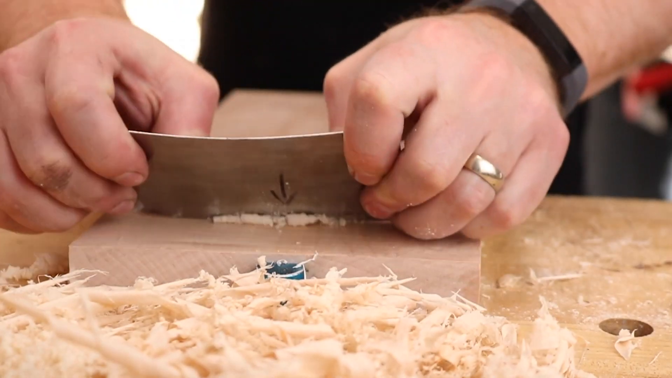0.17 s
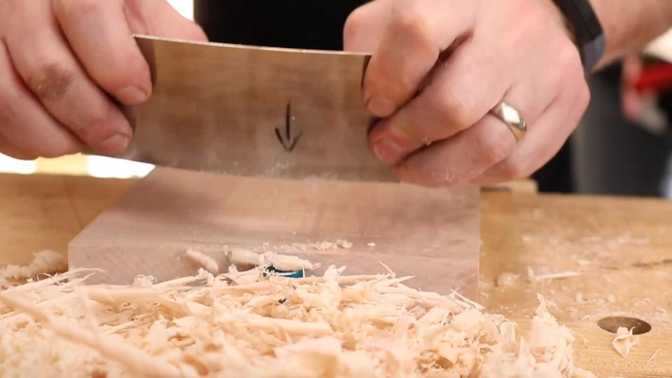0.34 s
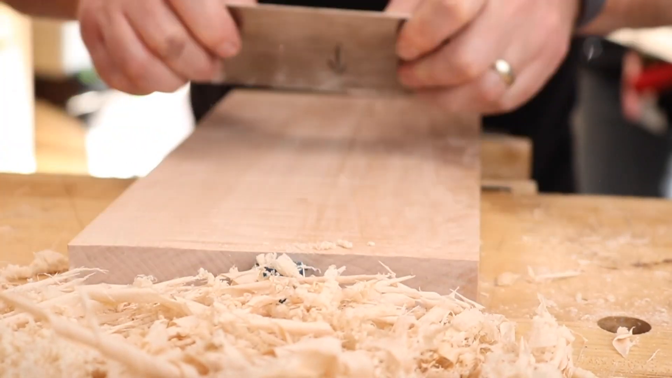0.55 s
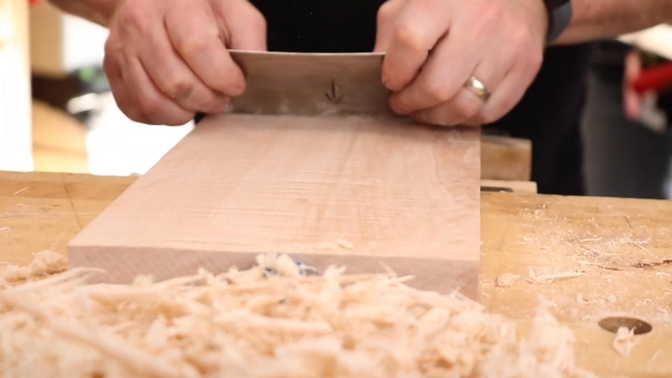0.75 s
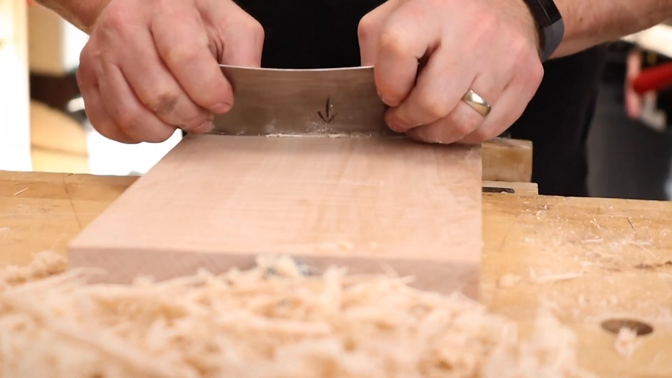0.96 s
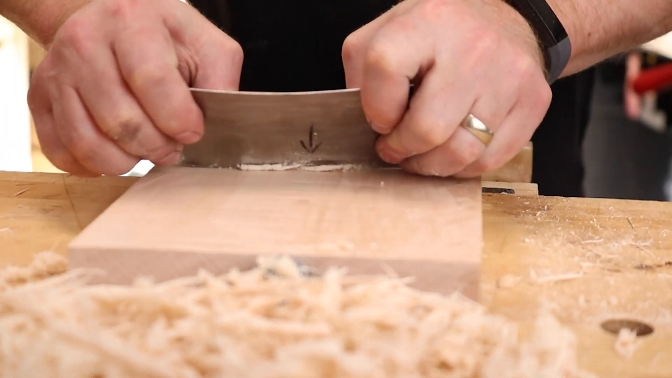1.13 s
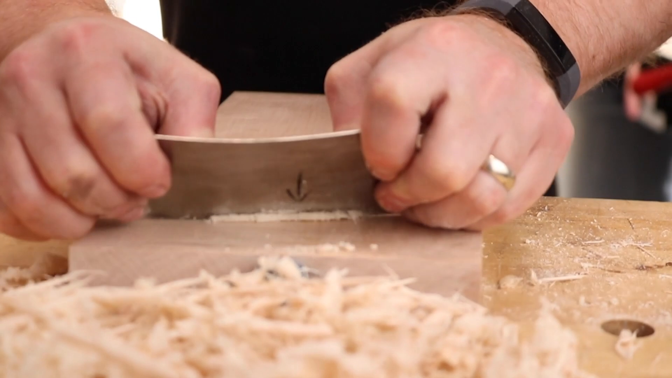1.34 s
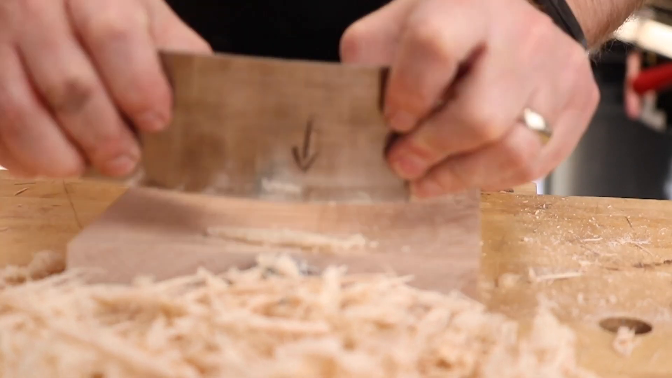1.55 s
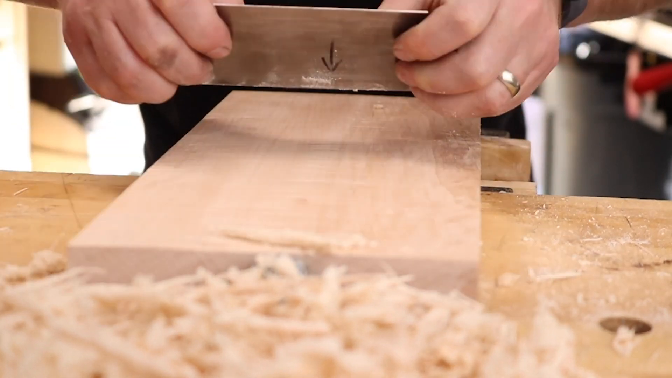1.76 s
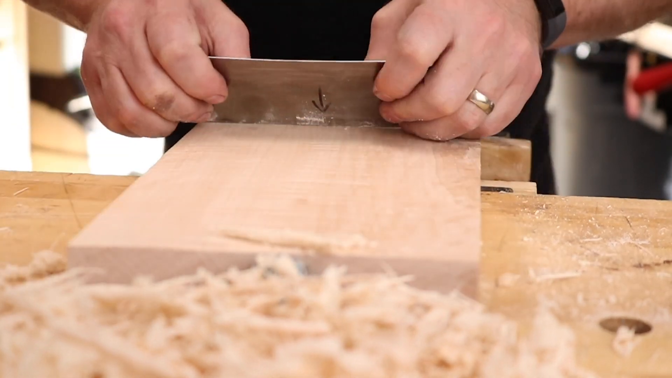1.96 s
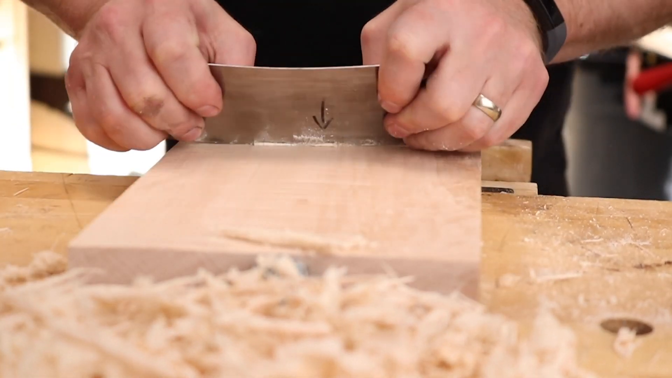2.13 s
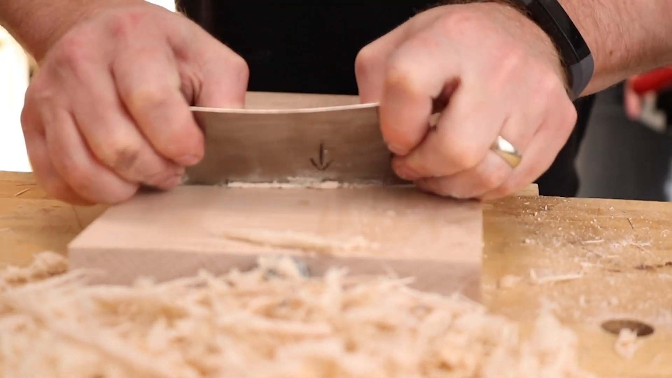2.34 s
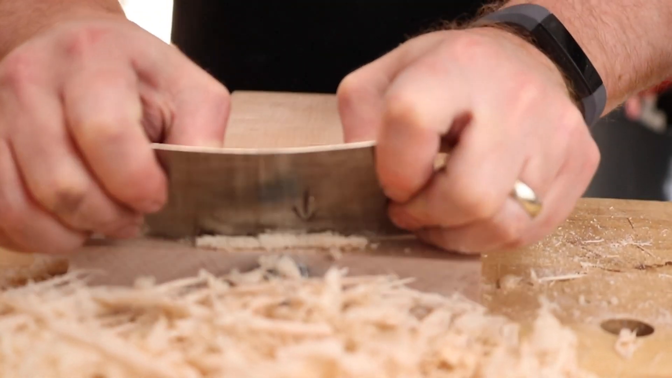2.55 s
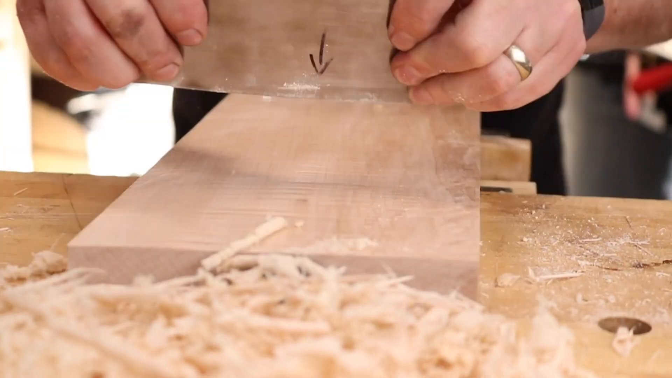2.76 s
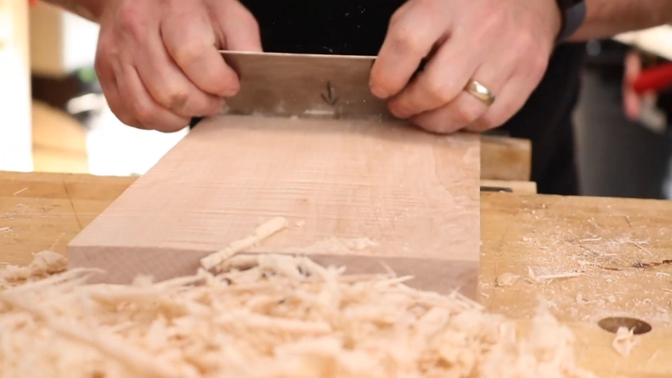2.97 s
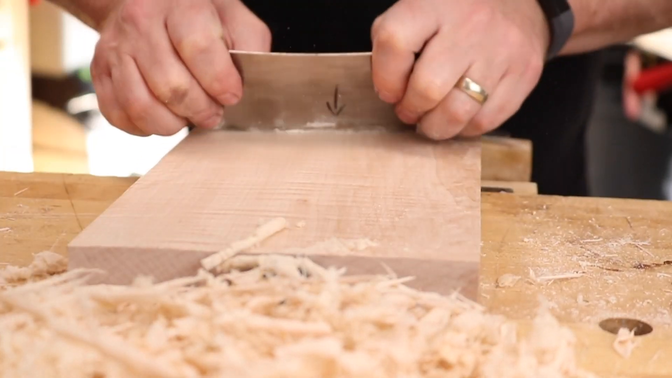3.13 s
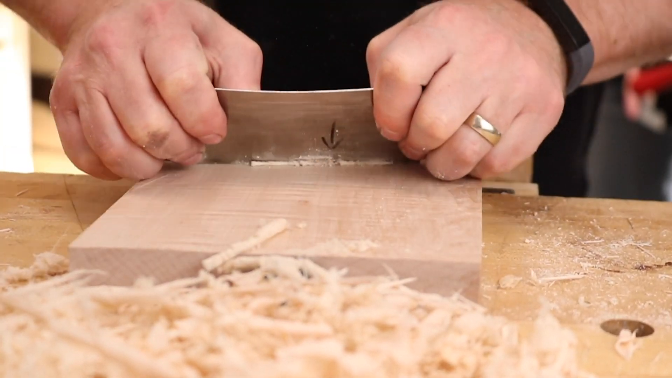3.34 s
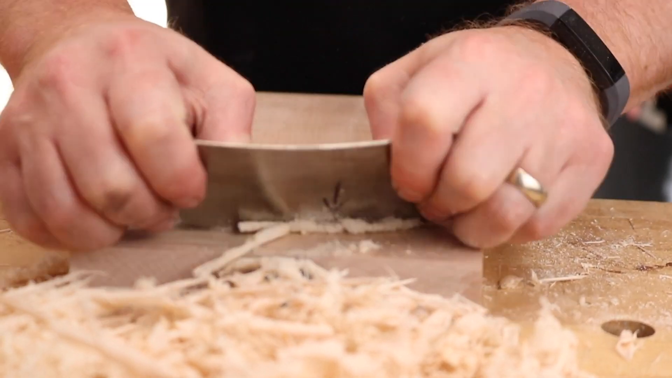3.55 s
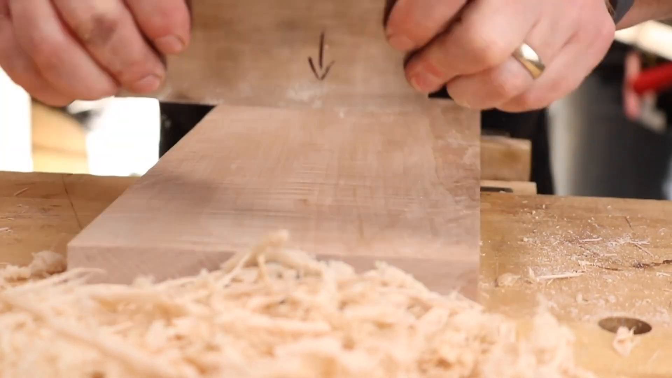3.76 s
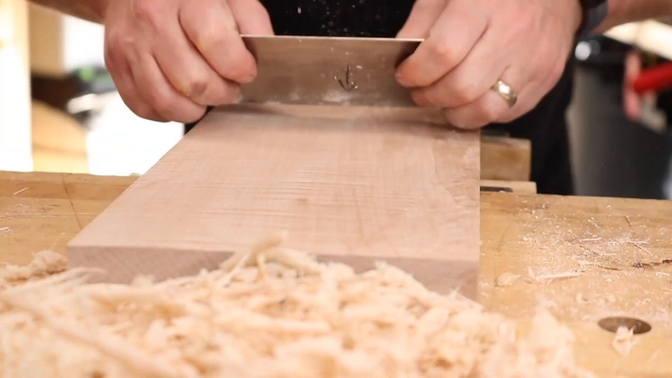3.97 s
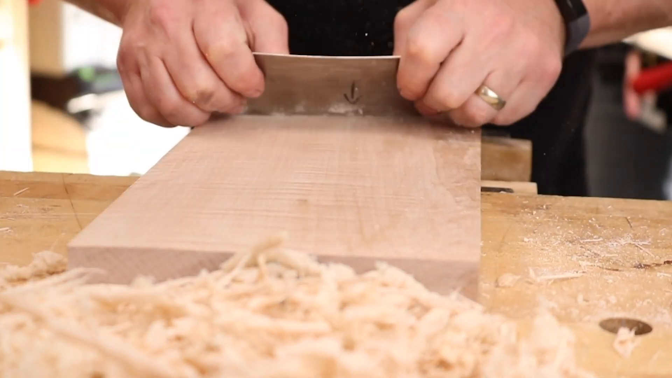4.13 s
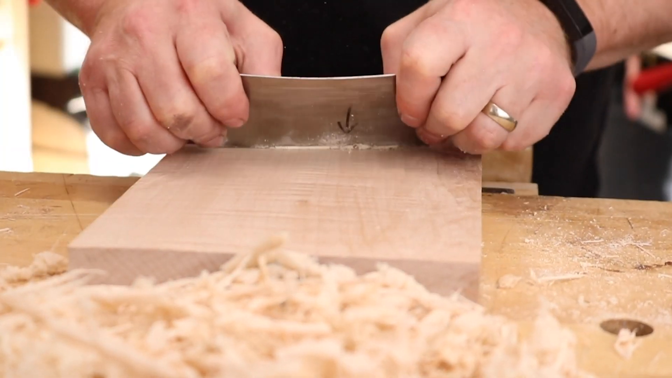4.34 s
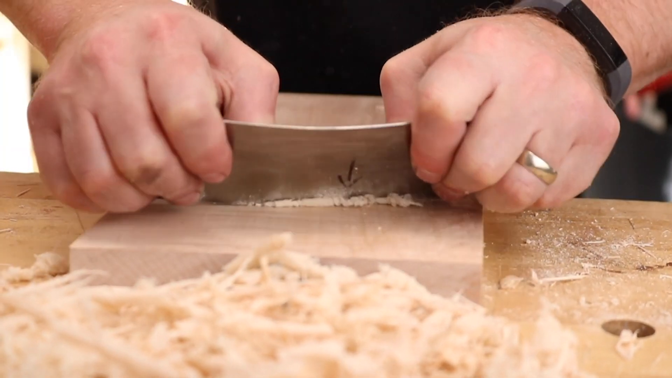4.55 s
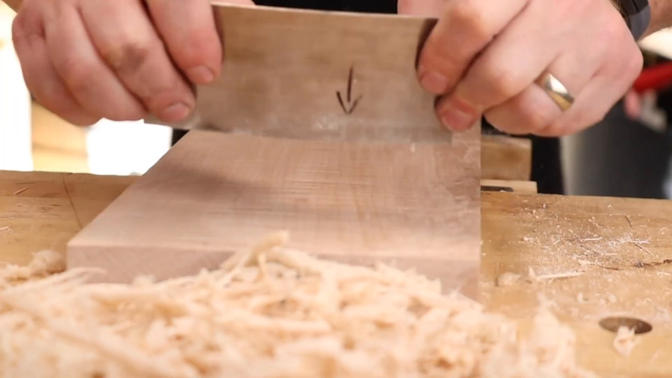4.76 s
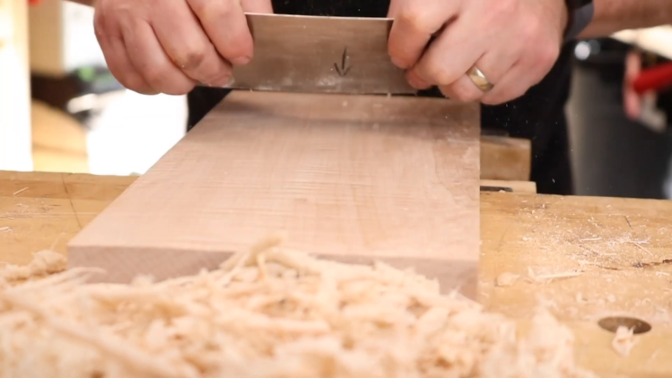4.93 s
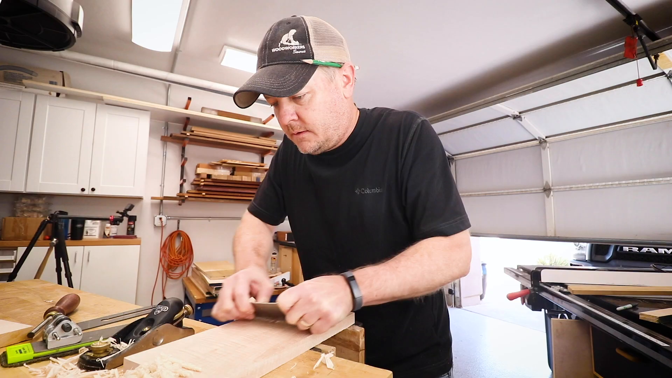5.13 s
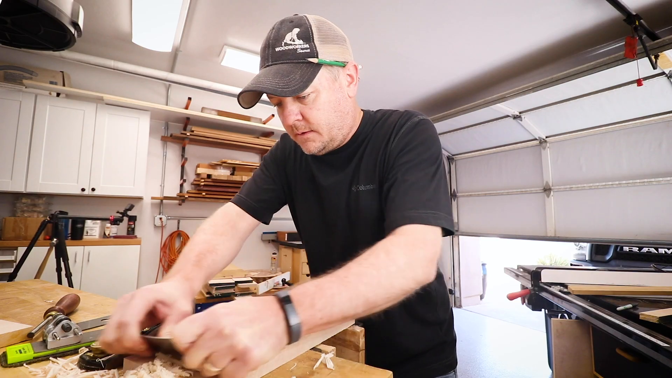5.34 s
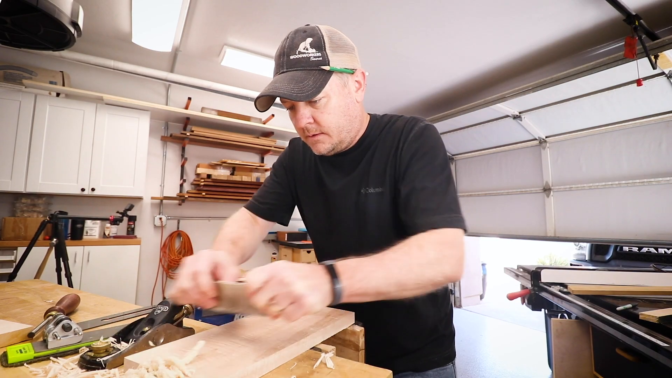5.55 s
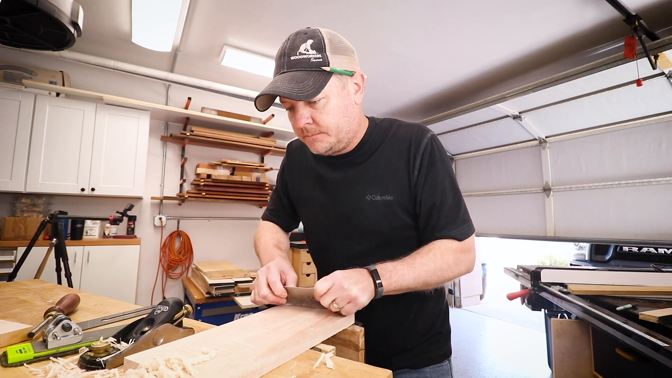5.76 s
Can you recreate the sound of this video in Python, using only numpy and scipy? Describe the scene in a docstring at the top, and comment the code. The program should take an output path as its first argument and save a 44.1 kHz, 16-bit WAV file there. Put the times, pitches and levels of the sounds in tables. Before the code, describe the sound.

A steel hand scraper is pushed along a hardwood board six times, about once a second. Each stroke opens with a knock as the blade is set down, then a bright, scratchy hiss swells and fades, with a thin squeal and occasional chatter. Some strokes run off the end with a bump, and the bench rumbles faintly. The microphone is close, in a small, quiet workshop.

```python
"""A steel card scraper, pushed six times along a hardwood board on the bench of a small, quiet shop.
Each stroke opens with a knock as the blade is set down, then hisses as the burr tears a shaving, and
now and then chatters. Some strokes run off the end and bump the bench, which rocks with a low rumble.
One close microphone, with a short room tail and a faint hum behind the work.
The hardest knocks clip at full scale, with a brief crunch."""
import sys
import numpy as np
from scipy import signal
from scipy.fft import rfft, irfft, next_fast_len
from scipy.io import wavfile
from scipy.ndimage import uniform_filter1d

SR = 44100
rng = np.random.default_rng(int(sys.argv[2]) if len(sys.argv) > 2 else 0)


def store_pcm(level_fs):
    """Save levels as 16-bit WAV."""
    pcm = np.round(np.clip(level_fs, -1, 1) * 32767).astype(np.int16)
    wavfile.write(sys.argv[1], SR, np.atleast_2d(pcm).T)


N = 255492
TIME = np.arange(N) / SR
STEPS = np.arange(0, N / SR, 1 / 1000)  # the hand's controls move once a millisecond

# the pushes: (start [s], end [s], cut [dB], fastest point [share of the stroke],
# slowing by the end [dB], drag [dB], rocking of the bench [dB])
STROKES = [(0.252, 0.741, -26, 0.52, 25.5, -33.5, -44.5), (1.137, 1.679, -27, 0.61, 9, -35.5, -42),
           (2.158, 2.751, -28, 0.71, 30, -35.5, -43), (3.135, 3.699, -30, 0.8, 22.5, -36.5, -36),
           (4.065, 4.594, -27.5, 0.68, 21.5, -35, -40.5), (5.038, 5.533, -27, 0.48, 25, -35.4, -47)]
# spectrum of the squealing blade: (frequency [Hz], density [dB])
SQUEAL = [(2500, -43), (3700, -9.5), (4150, -4.5), (4900, -2), (5750, -1.5), (6600, -3.5), (7500, -6),
          (11000, -22.5)]


def gain_of(db):
    """Decibels to amplitude."""
    return 10 ** (np.asarray(db) / 20)


def evened(x):
    """Scales to rms 1."""
    return x / np.sqrt(np.mean(x ** 2) + 1e-20)


def read(points, hz):
    """Reads a table on a log-frequency axis."""
    f, value = np.transpose(points)
    return np.interp(np.log(hz + 1), np.log(f + 1), value)


def add(mix, s, sound):
    """Mixes a sound in at time s."""
    part = mix[max(round(s * SR), 0):][:len(sound)]
    part += sound[:len(part)]


def bump(time, s, half_width):
    """A smooth swell of height 1 around time s."""
    return np.exp(-np.minimum(((time - s) / half_width) ** 2, 20))


def coloured(x, spectrum, resonances=()):
    """Gives x a spectrum with resonant peaks, at rms 1."""
    size = next_fast_len(N, real=True)
    hz = np.fft.rfftfreq(size, 1 / SR)
    peaks_db = sum(lift / (1 + (2 * (hz - f) / width) ** 2) for f, width, lift in resonances)
    return evened(irfft(rfft(x, size) * gain_of(read(spectrum, hz) + peaks_db), size)[:N])


def wander(hz):
    """Random drift up to a rate, at rms 1."""
    size = next_fast_len(N, real=True)
    rolloff = 1 + (np.fft.rfftfreq(size, 1 / SR) / hz) ** 4
    return evened(irfft(rfft(rng.standard_normal(size)) / rolloff, size)[:N])


def room_tone(air_db=-71, hum_hz=317.6, hum_db=-73):
    """Still shop air and a faint machine hum."""
    # spectrum of the air: (frequency [Hz], density [dB])
    air = [(20, 0), (80, -2), (160, -3), (260, -8), (400, -16), (700, -24), (1500, -27), (4000, -34),
           (9000, -44), (16000, -58)]
    hum = evened(np.sin(2 * np.pi * hum_hz * TIME + .3 * wander(hz=4)))
    return gain_of(air_db) * coloured(rng.standard_normal(N), air) + gain_of(hum_db) * hum


def ring(modes, place_hz, lift_db=8, octaves=0.25):
    """Dying modes; the place of the blow lifts those near one frequency."""
    t = TIME[:SR // 2]
    hz, db, t60 = np.transpose(modes)[:, :, None]
    db = db + lift_db * np.exp(-(np.log2(hz / place_hz) / octaves) ** 2)
    signs = np.cos(np.pi * np.arange(len(modes)))  # neighbours swing in opposite directions
    return signs @ (gain_of(db - 60 * t / t60) * np.sin(2 * np.pi * hz * t))


def click(t60=.009, band_hz=(2700, 9000)):
    """Steel meets wood: a bright crunch of a few milliseconds."""
    t = TIME[:SR // 2]
    crunch = signal.lfilter(*signal.butter(2, band_hz, "band", fs=SR), rng.standard_normal(len(t)))
    return evened(crunch) * gain_of(-60 * t / t60)


def room_tail(x):
    """The shop's walls answer: sparse reflections, each band dying at its own speed."""
    # decay of the room: (frequency [Hz], t60 [s])
    decay = [(100, .35), (300, .38), (900, .41), (1500, .39), (2500, .31), (5500, .25), (10000, .2),
             (16000, .145)]
    taps = rng.choice([-1., 1.], SR // 2) * (rng.random(SR // 2) < .15)
    hz, t, bands = signal.stft(taps, SR, nperseg=256)
    tail = signal.istft(bands * gain_of(-60 * t / read(decay, hz)[:, None]), SR, nperseg=256)[1]
    tail *= np.clip(TIME[:len(tail)] / 0.008 - 1, 0, 1)  # 8 ms before the walls are heard
    return signal.fftconvolve(x, tail / np.linalg.norm(tail))[:len(x)]


def knock(contact_hz, place_hz, bench_db, blade_db, thud_db, room_db):
    """A blow rings board, bench and blade; a soft contact weakens the click and the board's high modes."""
    # modes of board, bench, blade and the low thud: (frequency [Hz], level [dB], t60 [s])
    board = [(467.5, -30, .13), (525, -28.5, .08), (660, -16, .075), (775, -12.5, 0.066),
             (871, -15.5, .075), (1065, 0.5, 0.0086), (1295, 2.5, 0.005), (1640, -7.5, 0.018),
             (2050, -6, 0.0084), (2620, -8.5, 0.022), (3303, -15, 0.0069), (4880, -9, 0.0036)]
    bench = [(177, -33, .18), (247, -16, 0.022), (305, -26.5, 0.083), (337, -36.5, 0.24),
             (448.4, -16, 0.053), (534, -20, .04), (687, -16.5, 0.083), (824, -17.5, 0.055),
             (885.5, -10.5, 0.067), (930, -7.5, 0.02), (1058, -18, 0.11), (1190, -19, 0.0046),
             (1500, -25.5, 0.02), (1746, -40.5, 0.032)]
    blade = [(1438, -10, 0.027), (2020, -14.5, 0.013), (2894, -4.5, 0.015), (3310, -7.5, 0.011),
             (3990, -9, 0.018), (4480, -11.5, 0.024), (5800, -10.5, 0.011), (7250, -18.5, 0.0019)]
    thud = [(53.5, -6.5, 0.033), (82, -8.5, 0.058), (161, -13.5, 0.024)]
    # near echoes off the bench top and the worker's body: (delay [s], amplitude [share])
    echoes = [(.0054, 0.31), (0.0205, 0.039)]
    blow = signal.lfilter(*signal.butter(2, contact_hz, fs=SR), ring(board, place_hz))
    for modes, db in [(bench, bench_db), (blade, blade_db), (thud, thud_db)]:
        blow += gain_of(db) * ring(modes, place_hz)
    click_db = -19 + 12 * np.log2(contact_hz / 3120)  # 12 dB more per octave of hardness
    blow += gain_of(click_db) * click()
    out = blow + gain_of(room_db) * room_tail(blow)
    dulled = signal.lfilter(*signal.butter(1, 3000, fs=SR), blow)  # the echoes lose their treble
    for delay, share in echoes:
        add(out, delay, share * dulled)
    return out


def knocks():
    """The blade is set down, ticks on fibres and runs off the end of the board."""
    # the blade lands: (time [s], strength [dB], contact hardness [Hz], favoured frequency [Hz],
    # bench against board [dB], blade against board [dB])
    set_downs = [(0.1383, 2, 3110, 1198, -15.5, -15), (1.0772, -5, 3480, 2210, -10, -15.5),
                 (2.0522, -9, 900, 720, -24, -33), (3.0535, -11.5, 2950, 795, -27, -7.5),
                 (4.0221, 3, 3860, 2330, -13, -23), (4.9014, -11.5, 2870, 503, -10, -14.5)]
    # bumps as it runs off: (the same six columns, thud against board [dB], room against blow [dB])
    overruns = [(0.7394, -21, 1500, 434, -15, -7, -44, -16), (1.671, -15, 3386, 2170, 0.5, 8, 1, -7),
                (2.644, 2.5, 1140, 1151, -3.5, -47.5, -23, -7),
                (2.653, -19.5, 1103, 239, 14, -27.5, -19, -5),
                (2.705, -21.5, 1110, 1000, -12.5, -35, -36, 9.5)]
    # the edge catches on a fibre: (time [s], strength [dB], contact hardness [Hz])
    catches = [(0.2731, -15.5, 5200), (2.2765, -21, 3000)]
    out = np.zeros(N)
    for s, db, contact_hz, place_hz, bench_db, blade_db in set_downs:
        landing = knock(contact_hz, place_hz, bench_db, blade_db, thud_db=bench_db - 22.5, room_db=-11.5)
        add(out, s, gain_of(db) * landing)
    for s, db, *contact in overruns:
        add(out, s, gain_of(db) * knock(*contact))
    for s, db, contact_hz in catches:
        tick = knock(contact_hz, place_hz=2000, bench_db=-29.5, blade_db=-5, thud_db=-42, room_db=-12)
        add(out, s, gain_of(db) * tick)
    return out


def push(start, end, fastest, slowing_db, gather_db=16.5, hold_s=0.0083, lift_s=.006):
    """A stroke gathers speed, then slows ever faster: edge contact (0-1) and speed (dB re its top)."""
    progress = np.clip((STEPS - start) / (end - start), 0, 1)
    gathering = np.maximum(1 - progress / fastest, 0)
    slowing = np.maximum((progress - fastest) / (1 - fastest), 0)
    taking_hold = np.clip((STEPS - start) / hold_s + .5, 0, 1)
    letting_go = np.clip((end - STEPS) / lift_s + .5, 0, 1)
    return taking_hold * letting_go, -gather_db * gathering ** 3.7 - slowing_db * slowing ** 2.86


def effort():
    """Levels of hiss, rasp and squeal: they follow the speed of the push and the grain under the edge."""
    # the edge rides over hard grain: (time [s], half-width [s], loss of hiss and squeal [dB], rasp [dB])
    snags = [(0.282, 0.017, -2, -4), (1.192, 0.027, 6.5, 1.7), (1.268, .015, 7, 6.5), (2.305, 0.02, 7.5, 5),
             (3.275, 0.012, 1.5, 6), (4.208, 0.013, 6, 3.5)]
    # the burr takes a thicker shaving: (time [s], half-width [s], hiss [dB], squeal [dB], rasp [dB])
    bites = [(0.375, 0.045, 3.5, 1, -1.4), (0.44, 0.0083, 2.5, 8.5, 5), (1.332, 0.038, 3, 3.5, 3.5),
             (2.213, .05, 7, 2, 1.5), (2.393, 0.055, -2, 4.5, 4.5), (3.211, 0.036, 8.5, -0.9, -2),
             (3.35, 0.079, 5, 7, 4), (3.523, 0.056, 5.5, 8.5, 2.5), (4.253, 0.039, 3.5, -1, 2),
             (5.19, 0.021, 2.5, 4, 1)]
    # the edge brushes the wood before a push: (time [s], half-width [s], level [dB])
    brushes = [(0.195, 0.024, -48), (2.065, 0.018, -63)]
    levels = np.zeros((3, len(STEPS)))
    for start, end, cut_db, fastest, slowing_db, drag_db, _ in STROKES:
        contact, speed_db = push(start, end, fastest, slowing_db)
        hiss_db = cut_db + speed_db
        rasp_db = drag_db + 0.14 * speed_db
        squeal_db = cut_db - 1.5 + 0.59 * speed_db
        levels += contact * gain_of([hiss_db, rasp_db, squeal_db])
    for s, half_width, loss_db, rasp_db in snags:
        levels *= gain_of(np.outer([-loss_db, rasp_db, -loss_db], bump(STEPS, s, half_width)))
    for s, half_width, hiss_db, squeal_db, rasp_db in bites:
        levels *= gain_of(np.outer([hiss_db, rasp_db, squeal_db], bump(STEPS, s, half_width)))
    for s, half_width, db in brushes:
        levels += gain_of(db) * bump(STEPS, s, half_width)
    return np.array([np.interp(TIME, STEPS, level) for level in levels])


def fibres(per_s, snap_share, patchy_db):
    """Countless tiny fibre breaks with some larger snaps; the colour shifts across the grain."""
    sizes = gain_of(3.5 * np.minimum(rng.exponential(1, N), 5))
    snaps = evened(sizes * rng.choice([-1, 1], N) * (rng.random(N) < per_s / SR))
    bands = signal.stft(rng.standard_normal(N) + snap_share * snaps, nperseg=512)[2]
    patches = uniform_filter1d(rng.standard_normal(bands.shape), size=7, axis=0)  # smooth in frequency
    patches = evened(uniform_filter1d(patches, size=8, axis=1))  # and in time
    return signal.istft(bands * gain_of(patchy_db * patches), nperseg=512)[1][:N]


def scraping():
    """The cut hisses, the drag rasps through the board and the blade squeals, under one uneven grip."""
    # spectra of the cut and the drag: (frequency [Hz], density [dB])
    cut = [(3000, -39.5), (6000, -8.5), (7200, -6), (8200, 1.5), (9600, 3.5), (10800, 0.5), (12300, -0.5),
           (14000, -2), (15800, -8)]
    drag = [(200, -44), (350, -29.5), (480, -3.5), (620, 2.5), (770, 6), (1000, 2.5), (1150, 4),
            (1400, 2.5), (1600, 7.5), (2300, 0.5), (3700, -2), (5000, -5.5), (9000, -29.5)]
    # resonances of board and gripped blade: (frequency [Hz], width [Hz], lift [dB])
    gripped = [(2013, 220, 4.5), (2600, 400, 8.5), (3250, 410, 9)]
    grip = gain_of(np.outer([.9, 1.6, 1.3], wander(hz=128)))  # shakes hiss, rasp, squeal by these dB
    hiss = coloured(fibres(per_s=2400, snap_share=0.41, patchy_db=2.1), cut) * gain_of(-0.5)
    rasp = coloured(fibres(per_s=660, snap_share=0.47, patchy_db=2.5), drag, gripped) * gain_of(-1.0)
    squeal = coloured(fibres(per_s=1800, snap_share=0.35, patchy_db=2.0), SQUEAL) * gain_of(-1.87)
    return (effort() * grip * [hiss, rasp, squeal]).sum(0)


def chatter(skip_every_s=0.0088, skip_s=0.0039):
    """In deep bites the edge sticks and skips; each skip makes the blade squeal for a few milliseconds."""
    # runs of skips: (time of the hardest skip [s], half-width [s], level [dB])
    runs = [(0.4, 0.035, -19), (1.3257, 0.024, -21), (4.252, 0.028, -21.5)]
    level = np.zeros(N)
    for s, half_width, db in runs:
        from_skip_s = (((TIME - s) / skip_every_s + .5) % 1 - .5) * skip_every_s
        skips = np.exp(-(2 * from_skip_s / skip_s) ** 2)
        level += gain_of(db) * bump(TIME, s, half_width) * skips
    uneven = gain_of(-wander(hz=60))  # about 1 dB
    return level * uneven * coloured(rng.standard_normal(N), SQUEAL)


def bench_rocking(lag_s=0.086, rise_db_per_s=244, fall_db_per_s=108.5, rest_db=-69):
    """A deep rumble: the bench rocks back shortly after each push and never quite comes to rest."""
    # spectrum of the rumble: (frequency [Hz], density [dB])
    colour = [(10, -35), (20, -10), (32, 0), (45, -5), (65, -20), (110, -36), (250, -70), (1000, -140)]
    rumble = signal.hilbert(coloured(rng.standard_normal(N), colour))
    steady = evened(rumble.real / np.sqrt(abs(rumble) ** 2 + .5))  # flattens the chance swells
    level = gain_of(rest_db)
    for _, end, *_, rock_db in STROKES:
        t = TIME - end - lag_s
        level = level + gain_of(rock_db + np.minimum(rise_db_per_s * t, -fall_db_per_s * t))
    return steady * level


def scene():
    """One microphone close to the board, the same on both channels."""
    blade = scraping() + chatter()
    mono = blade + gain_of(-12.0) * room_tail(blade) + knocks() + bench_rocking() + room_tone()
    return np.array([mono, mono])


def record(dry):
    """The hardest knocks clip at full scale, with a brief crunch; the treble ends near 16 kHz."""
    low_pass = signal.firwin(401, 16050, window=("kaiser", 9), fs=SR)
    return signal.oaconvolve(np.clip(dry, -1, 1), low_pass[None], "same")


dry = scene()
out = record(dry)
store_pcm(out)
```